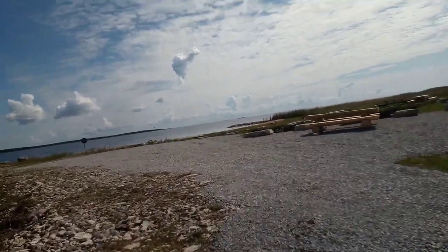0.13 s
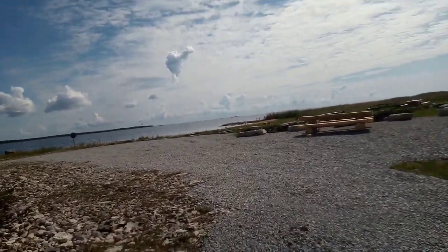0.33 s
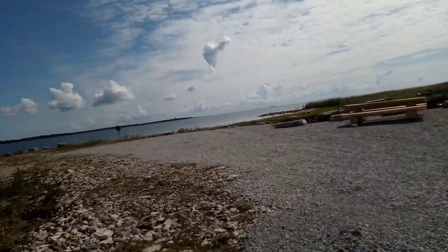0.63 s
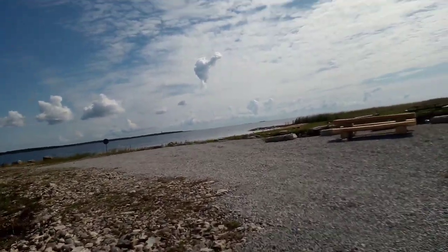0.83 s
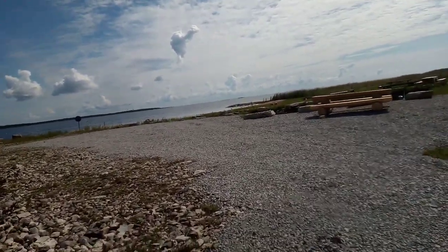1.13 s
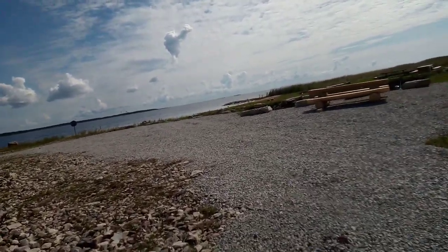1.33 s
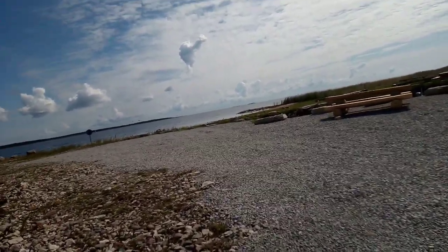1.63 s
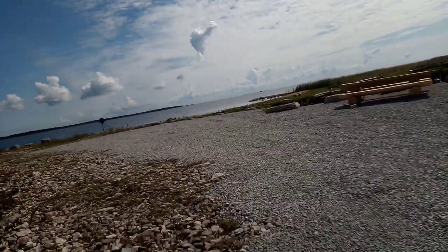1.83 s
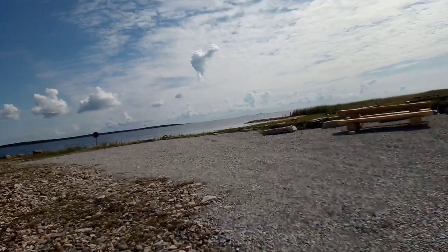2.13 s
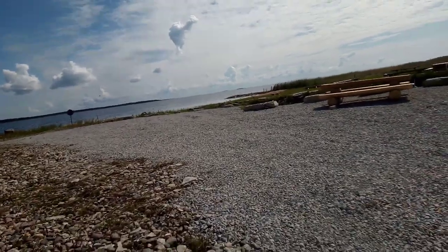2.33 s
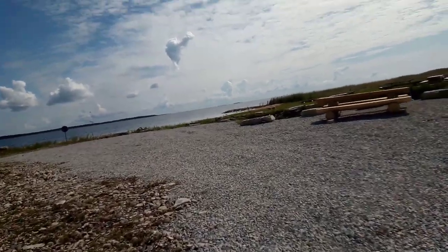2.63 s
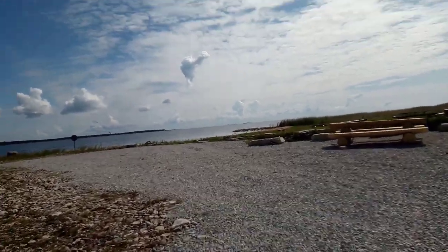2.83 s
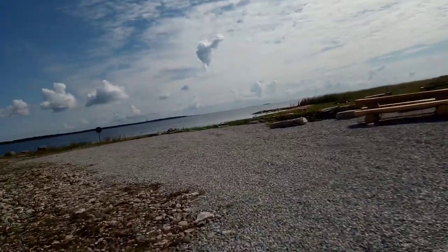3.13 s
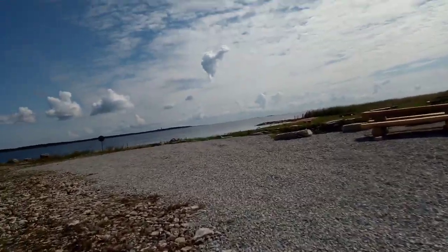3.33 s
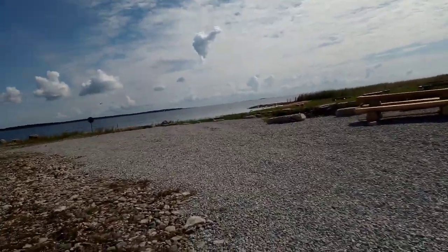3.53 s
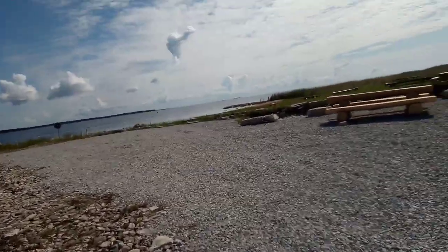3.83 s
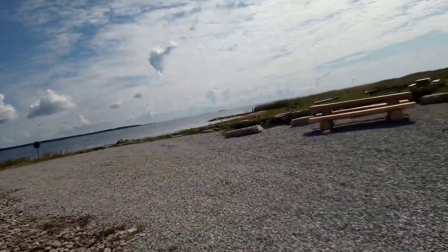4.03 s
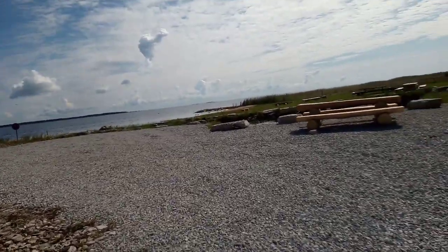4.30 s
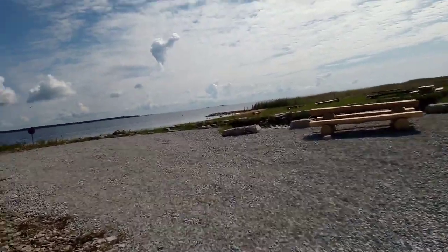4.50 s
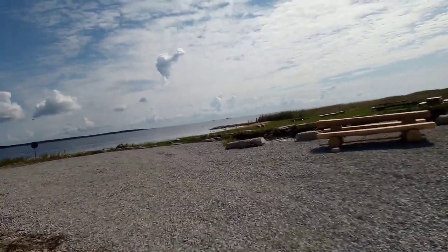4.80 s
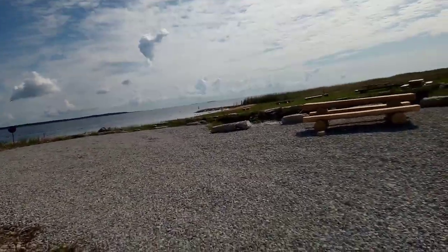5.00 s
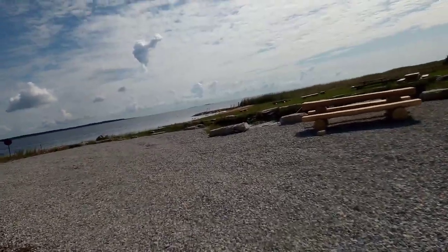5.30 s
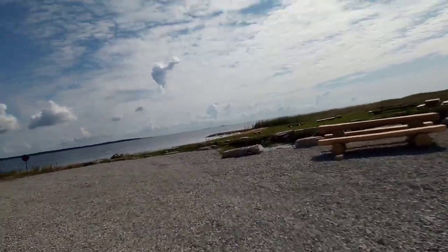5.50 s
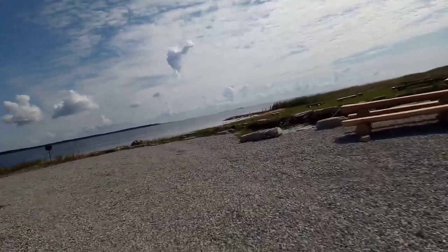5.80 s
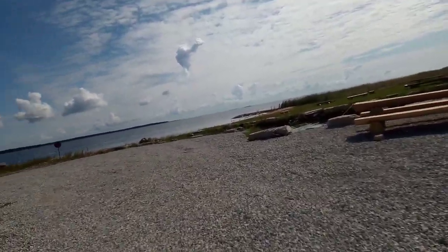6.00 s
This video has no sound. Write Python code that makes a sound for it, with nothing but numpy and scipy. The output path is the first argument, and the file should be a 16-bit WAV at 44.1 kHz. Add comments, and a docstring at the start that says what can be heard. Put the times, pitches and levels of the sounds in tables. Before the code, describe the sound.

Gulls call with harsh, rattling cries as wind buffets the microphone and slow footsteps crunch on gravel.

```python
"""Gulls on a windy shore

Gulls trill harsh, falling cries one over another, some rattling, some buzzing, echoed by stony ground.
The microphone is carried slowly over gravel, which grinds and knocks under the shoes. Wind rumbles
right on it, and gusts buffet it. Behind, a small bird whistles twice over the faint wash of the coast."""
import sys
import numpy as np
from scipy import signal
from scipy.fft import rfft, irfft
from scipy.io import wavfile
from scipy.ndimage import uniform_filter1d

SR = 44100
rng = np.random.default_rng(int(sys.argv[2]) if len(sys.argv) > 2 else 0)


def digitize_waveform(pressure):
    """Quantize a signal to 16-bit integers and store it at the path in sys.argv[1].

    Rows of a 2-D input are taken as channels; values are limited to [-1, 1].
    """
    field = np.atleast_2d(pressure).T
    bounded = np.clip(field, -1, 1)
    quanta = np.round(bounded * 32767).astype(np.int16)
    wavfile.write(sys.argv[1], SR, quanta)


N = 271215
TIME = np.arange(N) / SR

# Gull cries of both kinds: (start [s], length [s], rise [s], top pitch [Hz], late pitch [Hz],
# bend of the fall [under 1 early, over 1 late], trill rate [Hz], level [dB], swell over the cry [dB],
# brightness [dB], brightening over the cry [dB], rasp [dB])
RATTLES = [ (0.521, 0.54, .06, 1065, 885, .5, 66, -53, 5.5, 7.5, -11.5, -2),
           (1.055, 0.34, .11, 1040, 904, 1.6, 57.07, -54.5, 0.5, 9.5, -11, -1),
           (1.9, 0.54, .13, 985, 857, 1.36, 69.2, -53.5, 2.5, 9.5, -4, 0.5),
           (2.389, 0.24, 0.022, 1040, 831, 0.93, 60, -58, 8, 8, -3.5, 0.5),
           (3.197, .445, 0.19, 995, 849, 1.227, 69.09, -55, 2.5, 8.5, -5.5, 0),
           (3.714, 0.31, .12, 1095, 1010, 1.057, 60.1, -62, -3.5, -4, 3, 2),
           (4.039, 0.34, 0.0934, 1035, 975, 1.1, 54.55, -56.5, 1.5, 13.5, -2, 1),
           (4.4, .53, 0.073, 1093, 836, 0.6, 60.41, -54, -2, -5, -2.5, -6.5),
           (5.48, 0.25, 0.074, 1098, 998, 1.3, 61.44, -66.5, -4.5, -19, 6, -2)]
BUZZES = [ (2.6, .43, 0.073, 605, 533, 1.3, 105.4, -60, -6, 11, 0, 2.5),
          (3.61, 0.3685, 0.081, 588, 515, 0.68, 120.1, -55.5, -2.5, 7, -22.5, 3),
          (4.179, 0.92, 0.29, 551.1, 524, 0.91, 116.7, -61, -5.5, 3.5, 13, 1),
          (4.729, 0.24, 0.061, 570, 549.5, 0.89, 123.6, -51.5, -6.5, 7, -13, 1),
          (4.97, .2, 0.042, 576, 519, 0.66, 111.8, -54, -3, -2.5, 5, -6.5),
          (5.145, 0.18, 0.093, 643.4, 577, 1.8, 100.4, -59.5, 1, -2.5, 22, -5.5),
          (5.7, .32, 0.1104, 560, 547.5, 3, 112, -51, 5, 5, 15.5, 1),
          (5.95, 0.2174, 0.0527, 604, 548, 1.12, 114.7, -51.5, 12.5, 9, 1, 5)]
# Resonances of throat and beak for each kind: (frequency [Hz], gain [dB])
RATTLE_TRACT = [(500, -95), (900, -18), (1300, -2.5), (1750, 6.5), (2100, 4), (2400, -10), (2800, -19),
                (3300, -42.5), (4000, -24), (4700, -12.5), (5400, -19.5), (6400, -25), (7200, -28.5),
                (8600, -51.5)]
BUZZ_TRACT = [(500, -19.5), (1100, -12), (1600, 10), (1900, 8.5), (2200, -4), (2800, -16), (3350, -49),
              (3950, -19), (4500, -9), (5200, -24), (6400, -20.5), (7200, -28.5), (8600, -66)]
# Breeze on the microphone: (time [s], rumble level [dB])
BREEZE_LEVELS = [(0, -57.5), (.5, -50.5), (.85, -55), (.95, -55), (1.2, -61), (1.5, -54), (1.7, -53),
                 (2.08, -45), (2.25, -47.5), (2.42, -66), (2.65, -38.5), (2.95, -40), (3.14, -49.5),
                 (3.6, -39), (4.5, -41), (5.15, -36.5), (5.33, -50), (5.8, -37), (6.15, -49.5)]
# Gusts: (middle [s], length [s], rumble [dB], flutter over rumble [dB], tearing over flutter [dB])
WIND_GUSTS = [ (0.299, 0.018, -50.5, -1, -1), (0.658, 0.086, -26, -6.5, -10.5),
              (0.763, 0.18, -38.5, -19.5, -36), (1.073, 0.0509, -41, -12, -30),
              (1.31, 0.1, -32, -16, -36.5), (1.391, 0.051, -26, 0, -10.5), (1.43, 0.02, -24.5, -9, -27),
              (1.552, .07, -40.5, -23, -15), (2.288, 0.032, -36.5, -20, -27),
              (2.826, 0.0347, -27.5, -3, -7), (2.963, 0.03, -44, -1, -11.5),
              (3.037, 0.045, -33.5, -1.5, -18), (3.431, 0.054, -37.5, -3.5, -22),
              (3.581, 0.039, -32, 0.5, -15), (3.753, 0.0824, -33.5, -8, -25), (3.856, 0.053, -36, 0, -33.5),
              (4.195, 0.026, -30.5, -4.5, -24.5), (4.322, 0.12, -45, -7.5, -32),
              (4.715, 0.048, -32.5, -4, -10.5), (4.807, 0.0352, -29, 4.5, -10),
              (4.862, 0.035, -26.5, 3, -7), (4.989, 0.013, -33, 3, -8.5), (5.022, 0.024, -23, -5.5, -10),
              (5.119, 0.038, -34.5, 2, -23), (5.69, 0.085, -34.5, -2, -15.5),
              (5.868, 0.034, -37, 1.5, -32.5), (5.938, .05, -32.5, -7.5, -23)]
# Wind noise, from large eddies to small: (frequency [Hz], level [dB])
RUMBLE_SPECTRUM = [(20, -42), (40, -11.5), (65, 0.5), (120, 1), (170, -3.5), (230, -20), (330, -40.5),
                   (600, -91)]
FLUTTER_SPECTRUM = [(110, -18.5), (190, 10), (260, 4.5), (350, -4.5), (500, -19.5), (700, -49),
                    (1000, -54.5), (2500, -81.5)]
TEARING_SPECTRUM = [(250, 3), (400, 10.5), (510, 8), (700, -3.5), (1100, -26), (3000, -51), (8000, -67)]
# Eddies slapping the microphone: (time [s], peak [dB], frequency [Hz], bandwidth [Hz])
EDDY_SLAPS = [(.613, -29.5, 243, 200), (.633, -25.5, 199, 175.9), (.658, -22, 240.3, 200),
              (1.378, -18.5, 325, 360), (2.829, -22, 398, 420), (2.97, -20, 175, 183),
              (3.563, -22, 175, 158), (4.851, -16, 381, 380), (4.982, -29, 298, 287.4),
              (5.68, -25.5, 457, 292)]
# Gravel bursts: the first two rows are a sharp click and a brief bright hiss at the very start, the rest shoes
# grinding gravel: (middle [s], length [s], level [dB], grit over body [dB])
CRUNCH_BURSTS = [ (0.013, 0.01, -49, 10.5), (0.027, 0.073, -50, -5), (0.117, 0.1, -54, -10),
                 (0.348, 0.073, -61.5, -13), (0.782, 0.116, -50, -9.5), (1.295, .041, -58, -10),
                 (1.418, 0.074, -49.5, -8), (1.511, 0.1, -58.5, -12.5), (1.685, 0.11, -60, -21),
                 (1.961, 0.09, -54.5, -13.5), (2.048, 0.0573, -48.5, -12), (2.568, 0.049, -54, -11),
                 (2.713, 0.081, -53, -5), (2.986, 0.0073, -50.5, 1.5), (3.318, 0.065, -44.5, -15.5),
                 (3.348, 0.013, -38.5, -20), (3.456, 0.083, -54, -14.5), (4.009, .078, -51.5, -12),
                 (4.72, 0.034, -48.5, -7.5), (4.763, 0.0196, -44.5, -3.5), (5.429, 0.07, -55.5, -15.5),
                 (5.527, 0.044, -62, -38.5), (6.068, 0.06, -46.5, -22), (6.166, 0.029, -39.5, -8)]
# Dull body and bright grit of the gravel: (frequency [Hz], level [dB])
BODY_SPECTRUM = [(200, -49), (450, -1.5), (750, -0.5), (1100, 5.5), (1450, 10), (1900, 6), (2500, -18.5),
                 (3500, -8.5), (6000, -47)]
GRIT_SPECTRUM = [(1500, -25), (2700, -11), (3500, -4), (4200, -10), (5500, -1), (6800, 0), (8300, -19),
                 (10500, -15), (12500, -27), (15500, -18)]
# Single stones knocking underfoot: (time [s], peak [dB], frequency [Hz], bandwidth [Hz])
STONE_KNOCKS = [ (.09, -44.5, 6000, 9000), (.112, -43.5, 10500, 9000), (.294, -31, 978, 645),
                (.347, -47, 1600, 696), (1.556, -50, 1440, 904), (2.034, -38, 1100, 500),
                (2.134, -44.5, 1120, 600), (2.559, -35, 1370, 693), (2.983, -36, 4600, 6140),
                (2.985, -42, 1343, 700), (3.291, -29, 520, 680), (3.333, -21.5, 1040, 1430),
                (3.43, -37.5, 1050, 1227), (3.985, -40, 6130, 4070), (4.018, -45, 5900, 4000),
                (4.727, -34.5, 6660, 1210), (4.765, -35.5, 7420, 2000), (5.382, -50, 1090, 1220),
                (5.436, -37, 857, 1530), (5.489, -47.5, 1487, 994)]
# Small bird: (start [s], length [s], start pitch [Hz], end pitch [Hz], level [dB])
BIRD_WHISTLES = [(1.8, .085, 4040, 4150, -83.5), (3.987, 0.12, 4120, 4200, -61)]
# Wash of the distant shore: (frequency [Hz], level [dB])
SHORE_SPECTRUM = [(100, -15), (300, -4.5), (800, -11.5), (1200, -2.5), (1700, 1.5), (2200, -4.5),
                  (2800, -17.5), (3600, -9.5), (4400, -18.5), (6300, -12), (8500, -24.5), (13000, -25),
                  (15500, -15)]


def gulls():
    """Slow rattling and fast buzzing cries, scattered a little by stony ground on the way to us."""
    rattles = sum(cry(row, RATTLE_TRACT, sweep=.03, slowing=.1976, pulsing=.491, hoarse_db=(-3, -11),
                      between_db=-8, ring_harmonic=5, ring_db=3.5) for row in RATTLES)
    buzzes = sum(cry(row, BUZZ_TRACT, sweep=.015, slowing=.1093, pulsing=.97, hoarse_db=(-6, -12),
                     between_db=-16, ring_harmonic=8, ring_db=2) for row in BUZZES)
    cries = rattles + buzzes
    t = TIME[:SR // 2]
    scatter = rng.standard_normal(len(t)) * undb(-60 * t / .3)  # dies by 60 dB in 0.3 s
    return cries + undb(-13) * signal.fftconvolve(cries, scatter / np.linalg.norm(scatter))[:N]


def cry(row, throat, sweep, slowing, pulsing, hoarse_db, between_db, ring_harmonic, ring_db):
    """One cry: a harsh tone chopped by an uneven, slowing trill; it starts hoarse, clears as it falls."""
    start, length, rise_s, top_hz, late_hz, bend, trill_hz = row[:7]
    db, swell_db, bright_db, brightening_db, rasp_db = row[7:]
    end = start + length
    span = np.flatnonzero((TIME > start - .004) & (TIME < end + .015))
    t, n = TIME[span], len(span)
    age = np.clip((t - start) / length, 0, 1)
    rising = np.clip(1 - (t - start) / rise_s, 0, 1)
    sinking = np.clip((t - start - rise_s) / (length - rise_s), 0, 1)
    slack = np.exp(-(t - t[0]) / .018)  # pitch and brightness sag while the air pressure builds
    droop = np.exp(-np.abs(end - t) / .032)  # the pitch gives way as the cry ends
    hz = top_hz * (1 - .09 * rising ** 2) + (late_hz - top_hz) * sinking ** bend
    hz *= (1 - .13 * droop) * (1 - .15 * slack)
    edge_dull_db = 3.5 * (2 * age - 1) ** 2
    bright_db = bright_db + brightening_db * (age - .5) - edge_dull_db - 9 * slack
    hoarse = undb(rasp_db + np.interp(age, [0, 1], hoarse_db))
    beat_hz = trill_hz * (1 - slowing * age) * (1 + .25 * hoarse * walk(110, n))
    beat = 2 * np.pi * np.cumsum(beat_hz) / SR
    slide = np.sin(beat) - np.sin(2 * beat) / 3  # the pitch slides up and down on every beat
    pitch = hz * (1 + sweep * slide + .018 * hoarse * walk(600, n) + .009 * walk(40, n))
    phase = 2 * np.pi * np.cumsum(pitch) / SR
    voice = np.zeros(n)
    for k in np.arange(2, int(2 * 8600 / hz.mean())) / 2:
        treble = np.clip((k * hz - 2300) / 1700, 0, 1)
        gain = response(throat, k * pitch) * undb(treble * bright_db + 2.5 * walk(28, n))
        # one overtone rings out; unequal cycles add weak, noisy lines between the harmonics
        between = k % 1 > 0
        line_db = ring_db * (k == ring_harmonic) + (between_db + rasp_db) * between
        line = np.sin(k * phase + rng.uniform(0, 2 * np.pi)) * undb(line_db)
        rasp = walk(480, n) * np.sin(k * phase) + walk(480, n) * np.cos(k * phase)
        voice += gain * (line + hoarse * rasp * undb(between_db * between / 2))
    closing = (1 + np.cos(beat)) / 2
    voice *= 1 - np.clip(pulsing * (1 + .11 * walk(35, n)), 0, 1) * closing
    voice += ground_echo(voice, t)
    # hold the level below 2600 Hz steady, then shape it with the swell and the fades
    core = signal.sosfiltfilt(signal.butter(2, 2600, fs=SR, output="sos"), voice)
    voice /= np.sqrt(uniform_filter1d(core ** 2, size=2200) + 1e-9)
    fade = np.clip(np.minimum((t - t[0]) / .02, (t[-1] - t) / .022), 0, 1)
    out = np.zeros(N)
    out[span] = voice * undb(db + swell_db * (age - .5)) * fade
    return out


def ground_echo(voice, t):
    """The bounce off the ground reaches the microphone a few ms late and shifts as the bird flies."""
    lag_s = rng.uniform(.002, .005) + .0003 * walk(5, len(t))
    return .5 * np.interp(t - lag_s, t, voice)


def wind():
    """Large eddies rumble on the microphone; gusts add faster flutter, and the hardest tear at it."""
    breeze_db = np.interp(TIME, *np.transpose(BREEZE_LEVELS)) + 3.5 * walk(26, N)
    usual_db = -40.5
    excess_db = breeze_db - usual_db  # flutter and tearing grow faster than the rumble
    # one row each for rumble, flutter and tearing
    power = undb([breeze_db, breeze_db - 13.5 + excess_db, breeze_db - 40 + excess_db]) ** 2
    steepness = 7.28  # of a gust's flanks
    for middle, length, db, flutter_db, tearing_db in WIND_GUSTS:
        swell = 1 / (1 + np.abs(2 * (TIME - middle) / length) ** steepness)
        gains = undb(np.cumsum([db, flutter_db, tearing_db]))
        power += gains[:, None] ** 2 * swell
    rumble, flutter, tearing = np.sqrt(power)
    bursts = undb(2 * walk(70, N))
    rumble *= eddies(RUMBLE_SPECTRUM, steadiness=.8)
    flutter *= eddies(FLUTTER_SPECTRUM, steadiness=.744)
    tearing *= eddies(TEARING_SPECTRUM, steadiness=.33)
    return rumble + bursts * (flutter + tearing)


def eddies(spectrum, steadiness):
    """Turbulent pressure at the microphone; steadiness from 0 to 1 evens out its slow swells."""
    pressure = colour(rng.standard_normal(N), spectrum)
    power = uniform_filter1d(uniform_filter1d(pressure ** 2, size=1300), size=1300)
    return unit(pressure / (power + 1e-6) ** (steadiness / 2))


def footsteps():
    """Below the microphone each footfall presses the gravel, which gives in jerks: dull body, bright grit. A
    sharp click and a brief bright hiss open the scene."""
    body_gain, grit_gain = np.zeros(N), np.zeros(N)
    for middle, length, db, grit_db in CRUNCH_BURSTS:
        press = undb(db) * np.exp(-3.2 * ((TIME - middle) / length) ** 2)
        body_gain += press
        grit_gain += press * undb(grit_db)
    body = colour(grains(per_second=2000, spread_db=-2), BODY_SPECTRUM)
    jerks = undb(2 * walk(70, N))
    chips = colour(grains(per_second=2500, spread_db=0), GRIT_SPECTRUM)
    # stones of unlike size ring in turn, so each band of the grit flickers alone
    edges_hz = np.geomspace(1500, 16000, 15)
    grit = np.zeros(N)
    for band in zip(edges_hz, edges_hz[1:]):
        bandpass = signal.butter(2, band, "bandpass", fs=SR, output="sos")
        grit += signal.sosfiltfilt(bandpass, chips) * undb(4 * walk(60, N))
    return jerks * (body_gain * body + grit_gain * unit(grit))


def grains(per_second, spread_db):
    """Dense clicks of gravel, unequal in size."""
    hits = rng.random(N) < per_second / SR
    return hits * rng.standard_normal(N) * undb(spread_db * np.minimum(rng.exponential(size=N), 4))


def knocks(table, crackle_db):
    """Close blows of stones or eddies that die within a few cycles, each with a tiny crackle."""
    out, t = np.zeros(N), TIME[:SR // 30]
    for start, db, hz, width_hz in table:
        rise = np.pi * width_hz * t / 2
        ring = rise * np.exp(1 - rise) * np.sin(2 * np.pi * hz * t)
        crackle = rng.standard_normal(len(t)) * np.exp(-t / .0009)
        i = int(start * SR)
        out[i:i + len(t)] += undb(db) * (ring + undb(crackle_db) * crackle)
    return out


def small_bird():
    """Thin, slightly rising whistles in the background."""
    out = np.zeros(N)
    for start, length, start_hz, end_hz, db in BIRD_WHISTLES:
        age = np.clip((TIME - start) / length, 0, 1)
        hz = start_hz + (end_hz - start_hz) * age + 12 * walk(53, N)
        arch = 2 * np.sqrt(2 * age * (1 - age))
        out += undb(db) * arch * np.sin(2 * np.pi * np.cumsum(hz) / SR)
    return out


def shore():
    """Faint wash of water and grass in the distance, swelling slowly."""
    wash = colour(rng.standard_normal(N), SHORE_SPECTRUM)
    return wash * undb(-74.5 + walk(2.1, N) + .79 * walk(22, N))


def undb(db):
    """Decibels to gain."""
    return 10 ** (np.asarray(db) / 20)


def unit(x):
    """Scale to rms 1."""
    return x / np.sqrt(np.mean(x ** 2) + 1e-20)


def response(spectrum, hz):
    """Gain of a (frequency [Hz], level [dB]) spectrum at the given frequencies."""
    points_hz, db = np.transpose(spectrum)
    return undb(np.interp(np.log(hz + 1e-3), np.log(points_hz), db))


def colour(x, spectrum):
    """Filter by a spectrum and scale to rms 1."""
    return unit(irfft(rfft(x) * response(spectrum, np.fft.rfftfreq(N, 1 / SR)), N))


def walk(rate, n):
    """Random wander with about rate turns a second; spread near 1."""
    at = np.arange(n) * rate / SR
    return 1.28 * np.interp(at, np.arange(8192), rng.standard_normal(8192))


def scene():
    """The shore at one microphone, carried in the open wind."""
    cries = gulls()
    buffeting = wind() + knocks(EDDY_SLAPS, crackle_db=-52)
    gravel = footsteps() + knocks(STONE_KNOCKS, crackle_db=-43)
    return (cries + buffeting + gravel + small_bird() + shore())[None]


def record(dry):
    """The microphone's chain cuts the bass below 45 Hz and, steeply, the treble above 15.9 kHz."""
    low_cut = signal.butter(2, 45, "highpass", fs=SR, output="sos")
    high_cut = signal.ellip(10, .2, 80, 15900, fs=SR, output="sos")
    return signal.sosfilt(high_cut, signal.sosfilt(low_cut, dry))


dry = scene()
out = record(dry)
digitize_waveform(out)
```